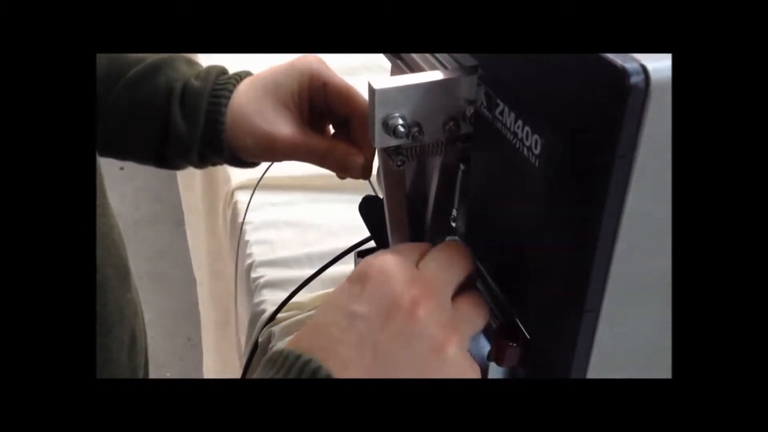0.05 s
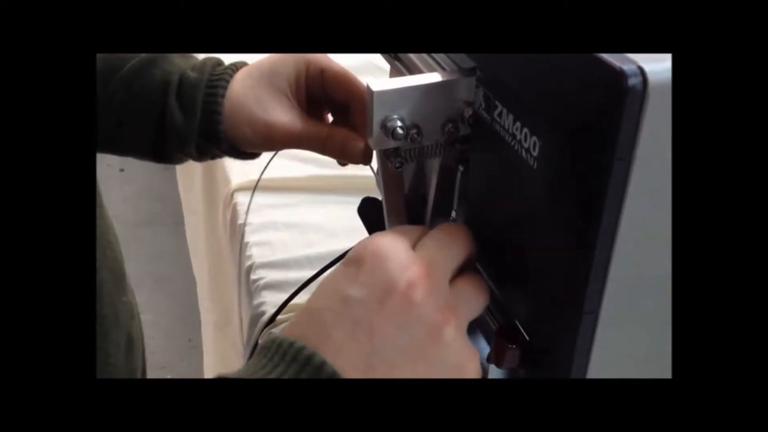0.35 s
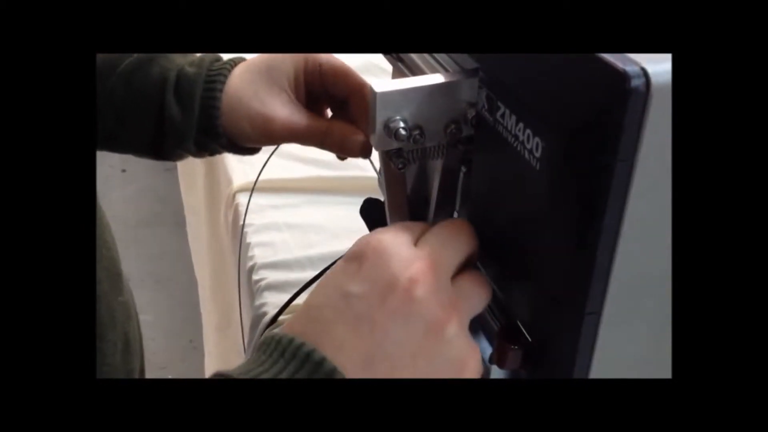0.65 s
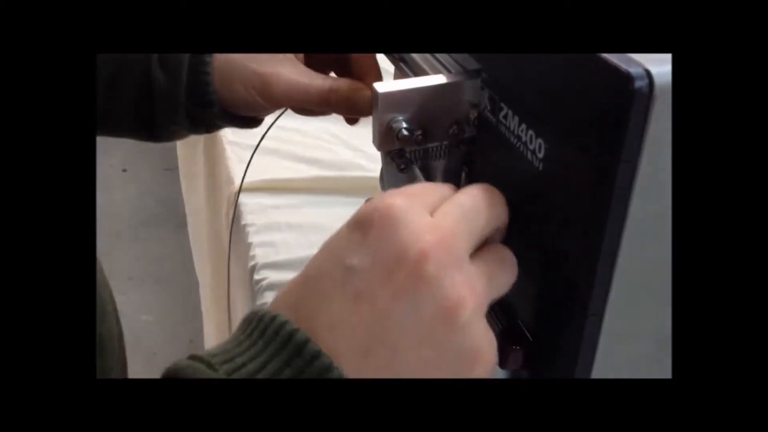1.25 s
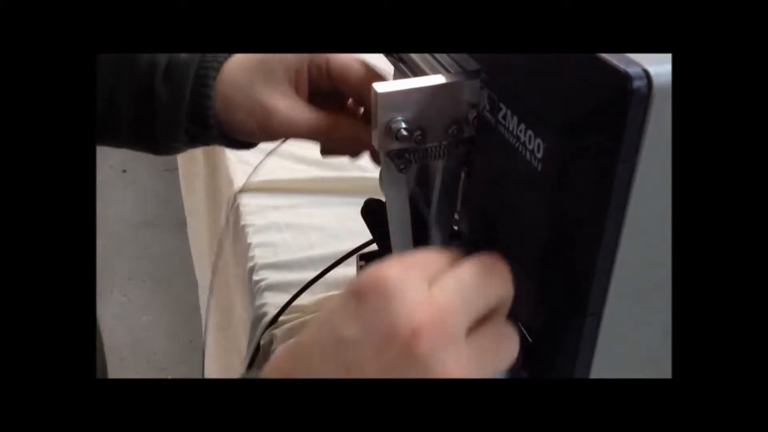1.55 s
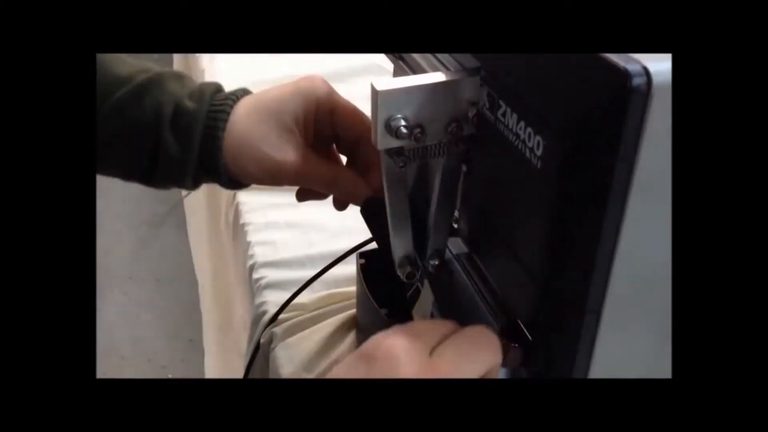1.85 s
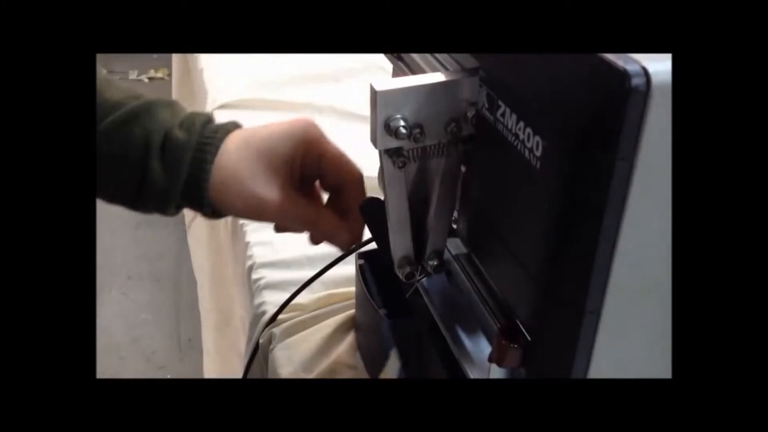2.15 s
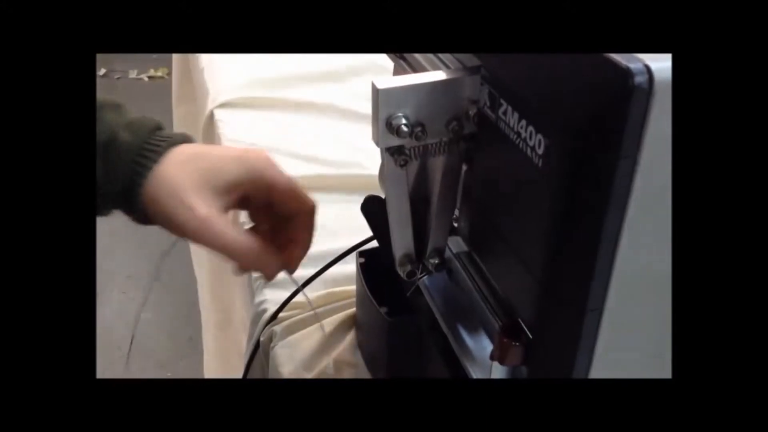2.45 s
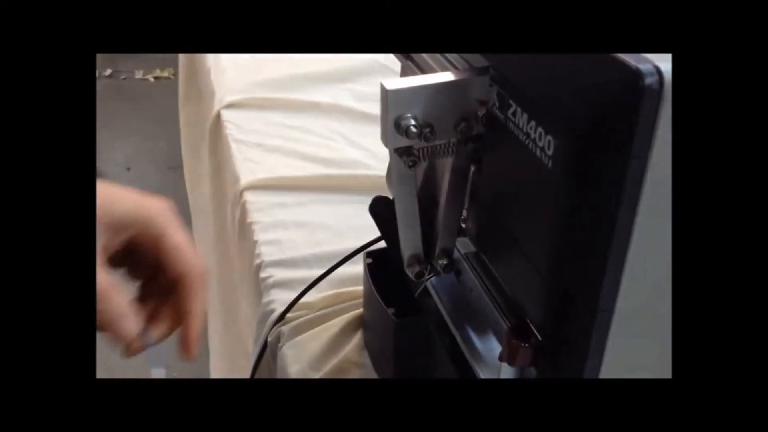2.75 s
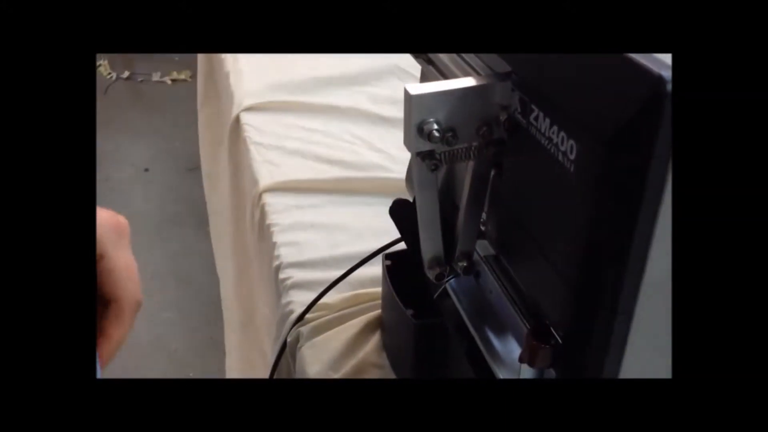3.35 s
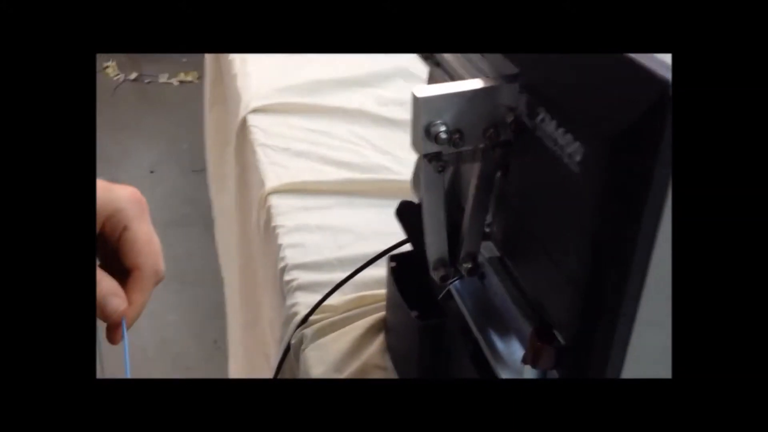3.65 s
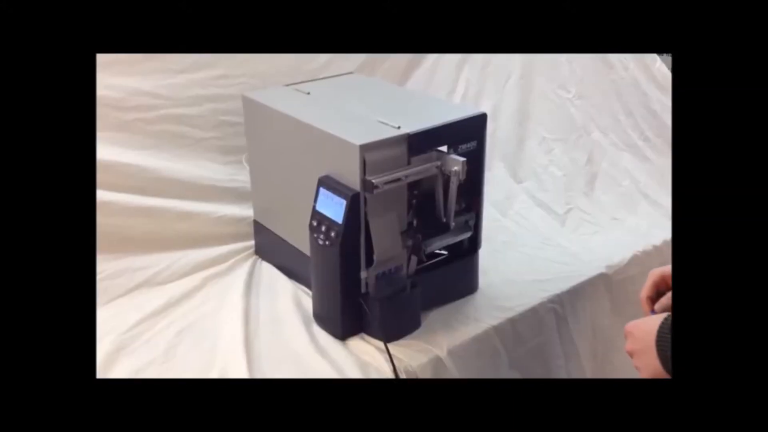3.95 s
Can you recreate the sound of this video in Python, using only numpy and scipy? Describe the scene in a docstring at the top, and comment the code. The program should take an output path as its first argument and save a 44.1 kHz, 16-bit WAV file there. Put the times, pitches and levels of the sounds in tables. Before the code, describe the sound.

Sparse, close clicks come from a label printer being handled in a quiet room with a faint hum. Light thumps and brushing fingers accompany them, until a cloth swish leads into a short cluster of hollow knocks and snaps.

```python
"""A faint mains hum fills a quiet room, and sleeves and fingers brush softly over a label printer.
Hands work its print head: the latch clicks, the frame thumps as the head bumps its stop, and small
parts tick. The hand lets go with a dull scuff. A longer swish of cloth leads to a burst of hollow
knocks on a panel, whose ring is cut off when the sound drops out for a moment."""
import sys
import numpy as np
from scipy import signal
from scipy.fft import rfft, irfft
from scipy.io import wavfile
from scipy.ndimage import uniform_filter1d

SR = 44100
rng = np.random.default_rng(int(sys.argv[2]) if len(sys.argv) > 2 else 0)


def output_pcm(signal):
    """Save a mono or channel-first signal as 16-bit PCM at the path in sys.argv[1].

    Samples are clipped to [-1, 1] before scaling.
    """
    pcm = np.clip(np.atleast_2d(signal).T, -1, 1) * 32767
    wavfile.write(sys.argv[1], SR, np.round(pcm).astype(np.int16))


N = 176400  # 4 seconds

# Tone color of the room's steady noise: pitch_hz, level_db
AIR_COLOR = [(15, -64), (25, -29), (86, -18.5), (110, -9), (148, -8.5), (246, -3.5), (290, -7.5),
             (340, -11), (600, -10.5), (970, -12.5), (1900, -15.5), (2300, -18.5), (4300, -21.5),
             (6050, -22.5), (8000, -24.5), (10000, -28), (12000, -23.5), (15500, -19.5)]
# Tones of the hum: pitch_hz, level_db
HUM_TONES = [(100, -84.5), (120, -72), (197, -82.5), (242, -85.5)]
# The room's echo (decay_s is always the time to fade by 60 dB): pitch_hz, decay_s
ROOM_DECAY = [(150, 0.42), (500, 0.31), (2000, 0.4), (6000, 0.27), (14000, 0.057)]
# Brushes, the narrowest a faint whistle: peak_s, rise_s, fade_s, level_db, center_hz, width_octaves
BRUSH_STROKES = [(.01, .02, .05, -65, 4100, 0.54), (.19, 0.062, 0.12, -71, 4250, 0.41),
                 (.34, 0.0071, 0.077, -67, 8000, 1.1), (.852, 0.11, 0.022, -67.5, 7460, 0.97),
                 (1.471, 0.018, 0.031, -57.5, 8200, 1), (1.655, 0.036, 0.016, -58, 5050, 2.3),
                 (1.74, 0.41, 0.15, -64, 7500, 2.6), (1.72, 0.24, .1, -70, 8000, 0.053),
                 (2.04, 0.013, 0.044, -57.5, 7430, 1.7), (2.39, 0.016, 0.033, -68, 4530, 0.16),
                 (2.71, .04, 0.035, -65, 3720, 0.49), (2.808, .015, 0.015, -58, 4240, 0.18),
                 (2.92, 0.65, 0.73, -66, 10800, 4.3), (3.105, .02, 0.056, -63, 13000, 0.37),
                 (3.19, 0.028, 0.06, -61.5, 2460, 0.82), (3.38, 0.25, .1, -66, 11800, 1.8),
                 (3.3, 0.14, 0.15, -74, 10600, .012), (3.47, 0.021, 0.1, -51.5, 3430, 1.24),
                 (3.523, 0.014, 0.04, -42.5, 10600, 1.37), (3.71, 0.025, 0.055, -56.5, 9000, 0.7),
                 (3.885, 0.023, 0.046, -63.5, 4900, 0.25), (3.96, 0.076, 0.18, -66, 415, 0.33)]
# Tone color of sliding cloth: pitch_hz, level_db
CLOTH_COLOR = [(100, -15), (400, -2), (750, 8.5), (1500, 3), (2800, -4), (4300, 0), (6000, -5.5),
               (7800, -3), (9500, -7), (11500, -1.5), (15000, -5.5)]
# Clicks of the latch and small parts: start_s, level_db, ring_hz, ring_db, tilt_db_per_octave, decay_s
CLICK_HITS = [(.3168, -9, 4550, -4.5, -1.6, 0.017), (.349, -26, 8150, 4, 4, 0.023),
              (.3565, -30, 4800, 5, 0, 0.008), (.8555, -36, 4620, 0, 2, 0.027),
              (0.8599, -33.5, 4700, -2, 1, 0.02), (0.868, -30, 13800, 0, 9, 0.0074),
              (1.146, -36, 2260, -4, -3, 0.014), (1.532, -35.5, 11000, -9, 0, 0.012),
              (1.540, -34.5, 11100, -6, 3, 0.011), (1.9606, -21.5, 4470, -3, -3, 0.018),
              (2.0469, -22.5, 4380, -2, -2.5, 0.0085), (2.0515, -25, 12700, 10, -5, 0.018),
              (2.059, -24, 13000, 13, 2, .011), (2.9026, -18, 9800, -9.5, 7, 0.016),
              (2.9998, -34, 7800, 3, 2, 0.023), (3.074, -36, 7800, -5, 4, .02),
              (3.0837, -16.5, 12200, -7, 19, 0.0067), (3.0893, -25, 12500, 6, 19, 0.0052),
              (3.145, -32, 6800, -6, 0, .035), (3.175, -30, 7700, -3, 0, .03),
              (3.6587, -14, 5050, -4, -3.5, 0.016), (3.6601, -11, 6270, 4, -3, 0.014),
              (3.6637, -17, 2342, -4, -8.5, 0.042), (3.7666, -20.5, 13300, -2, 3.5, 0.011)]
# Tones the latch rings with: pitch_hz, level_db
LATCH_TONES = [(1900, -7), (2400, -0.5), (2850, -4.5), (3400, -14), (4400, -11), (5000, -1.5), (5650, -3),
               (7700, -6), (8900, -5.5), (9700, -8), (10900, -3.5), (12600, -6), (14200, 0)]
# Thumps of the frame: start_s, level_db, pitch_hz, swell_s, ring_db
THUMP_HITS = [(0.3245, -38, 251, 0.012, -4), (0.3608, -30, 242.4, 0.01, 1), (.864, -46, 270, 0.0064, 4.5),
              (2.0563, -34.5, 228, 0.0073, 1.5), (2.0815, -46.5, 204, 0.0052, 5),
              (3.21, -51, 200, 0.011, -9)]
# Tones the frame rings with: pitch_hz, level_db, decay_s
FRAME_TONES = [(195.5, -11, 0.55), (242, -6, 0.17), (279.6, -11.5, 0.39), (355, -20, 0.15),
               (516, -10, 0.33), (562, -18, 0.35), (713, -20, 0.068), (830, -10, 0.22), (980, -8, .2)]
# Tone color of the frame's shudder: pitch_hz, level_db
SHUDDER_COLOR = [(60, -40), (110, -20), (170, -10), (260, -4), (400, 9), (560, 6), (900, -2), (1500, -9),
                 (3000, -49), (8000, -48)]
# Hollow knocks: start_s, level_db, pitch_hz, swell_s
KNOCK_HITS = [(.355, -44.5, 726, 0.0047), (.3605, -39, 540, 0.0043), (.864, -57, 527, 0.0043),
              (2.041, -47.5, 547, 0.0057), (3.521, -42, 655, .005), (3.589, -46, 686, 0.0015),
              (3.595, -43.5, 715, .0035), (3.6135, -38.5, 622, 0.0073), (3.6462, -34.5, 780, 0.0019),
              (3.6512, -36.5, 690, .003), (3.6813, -18.5, 650, 0.0038)]
# Tones the panel rings with: pitch_hz, level_db, decay_s
PANEL_TONES = [(573, -32, 0.41), (632.3, -31, 0.24), (672, -40, 0.19), (752, -21.5, 0.23),
               (1218, -25, 0.31), (1330, -29.5, 0.38), (1460, -29.5, .12), (1810, -33, 0.19),
               (1851, -26, 0.16), (2036, -32.5, 0.092), (2552, -35, 0.25)]
# Tone color of the noisy rap in each knock: pitch_hz, level_db
RAP_COLOR = [(80, -41), (250, -2), (400, -6), (650, 9), (980, -14), (1250, 0.5), (2000, -2), (2700, -11.5),
             (3500, -15.5), (12000, -31.5)]
# Tone color of the scuff: pitch_hz, level_db
SCUFF_COLOR = [(88, -53), (150, -37), (233, -11), (319, -14), (524, -1), (680, -16), (813, 0.5),
               (1080, -22), (1260, -10), (2220, -16.5), (2580, -41), (4000, -44), (5200, -61), (8800, -120)]

LOW_CUT_HZ, TOP_HZ = 110, 15450
CLICK_RISE_S, CLICK_LOW_HZ = 0.00013, 680
RING_BUILD_S, RING_WIDTH_OCTAVES = 0.015, 0.27
DROPOUT_S, RETURN_S, DROPOUT_FADE_S = 3.782, 3.8295, 0.0074


def gain(db):
    """Turns decibels into a number to multiply by."""
    return 10 ** (np.asarray(db) / 20)


def unit_power(x):
    """Scales a sound so its average power is 1."""
    return x / np.sqrt(np.mean(x ** 2) + 1e-20)


def unit_energy(x):
    """Scales a sound so its total energy is 1."""
    return x / np.sqrt(np.sum(x ** 2) + 1e-20)


def look_up(table, hz):
    """Reads between the rows of a table, with pitch spaced by octaves."""
    pitches, values = np.transpose(table)
    return np.interp(np.log(hz + 1), np.log(pitches + 1), values)


def add(mix, start_s, sound):
    """Mixes a sound in at its start time."""
    part = mix[max(round(start_s * SR), 0):][:len(sound)]
    part += sound[:len(part)]


def noise(color, size):
    """Noise with the given tone color and a power of 1."""
    weights = gain(look_up(color, np.fft.rfftfreq(size, 1 / SR)))
    return unit_power(irfft(rfft(rng.standard_normal(size)) * weights, size))


def decay(t, decay_s):
    """A fade that falls 60 dB in decay_s."""
    return np.exp(-np.log(1000) * t / decay_s)


def ring(tones, t):
    """A struck object rings with several tones, each fading at its own speed."""
    return sum(gain(db) * decay(t, decay_s) * np.sin(2 * np.pi * hz * t) for hz, db, decay_s in tones)


def push(t, hz, swell_s):
    """A few vibrations that swell and die just as fast."""
    return np.sin(np.pi / 2 * np.minimum(t / swell_s, 2)) ** 2 * np.sin(2 * np.pi * hz * t)


def rub_pressure(peak_s, rise_s, fade_s):
    """A rub presses in smoothly, then eases off."""
    t = np.arange(N) / SR - peak_s
    return np.exp(-(np.minimum(t, 0) / rise_s) ** 2 - np.maximum(t, 0) / fade_s)


def room_echo(sound, level_db):
    """The room answers with a soft wash of echoes whose highest tones die first."""
    hz, t, spectrum = signal.stft(rng.standard_normal(SR // 2), SR, nperseg=256)
    fades = decay(t, look_up(ROOM_DECAY, hz)[:, None])
    tail = signal.istft(spectrum * fades, SR, nperseg=256)[1]
    tail[:SR // 300] = 0  # the first echo takes about 3 ms to return
    return gain(level_db) * signal.fftconvolve(sound, unit_energy(tail))[:N]


def air_and_hum():
    """Steady room noise and a mains hum that wavers slightly."""
    t = np.arange(N) / SR
    out = gain(-64) * noise(AIR_COLOR, N)
    for hz, db in HUM_TONES:
        wobbles = rng.standard_normal(30) + 1j * rng.standard_normal(30)  # in level and phase
        waver = 1 + 0.049 * np.interp(t, np.linspace(0, N / SR, num=30), wobbles)
        out += np.sqrt(2) * gain(db) * (waver * np.exp(2j * np.pi * hz * t)).real
    return out


def brushes():
    """Cloth and skin slide over the printer in tiny uneven slips."""
    out, hz = np.zeros(N), np.fft.rfftfreq(N, 1 / SR) + 1
    cloth = gain(look_up(CLOTH_COLOR, hz)) * (hz < TOP_HZ)
    for peak_s, rise_s, fade_s, db, center_hz, width_octaves in BRUSH_STROKES:
        hiss = rng.standard_normal(N)
        grain_db = 1.5 * unit_power(uniform_filter1d(rng.standard_normal(N), size=40))
        band = 1 / (1 + 0.5 * (np.log2(hz / center_hz) / width_octaves) ** 2)
        swish = unit_power(irfft(rfft(hiss * gain(grain_db)) * cloth * band, N))
        out += gain(db) * rub_pressure(peak_s, rise_s, fade_s) * swish
    return out


def latch_clicks():
    """Each snap makes a crack and rings the latch and the part it hits; only the crack echoes."""
    out, cracks, t = np.zeros(N), np.zeros(N), np.arange(4096) / SR
    hz = np.fft.rfftfreq(len(t), 1 / SR) + 1
    band = (hz / np.hypot(hz, CLICK_LOW_HZ)) ** 2 * (hz < TOP_HZ)
    for start_s, db, ring_hz, ring_db, tilt, decay_s in CLICK_HITS:
        brightness = gain(tilt * np.log2(np.clip(hz, CLICK_LOW_HZ, TOP_HZ)))
        crack = unit_power(irfft(rfft(rng.standard_normal(len(t))) * brightness * band))
        latch = sum(gain(tone_db + tilt * np.log2(f)) * np.sin(2 * np.pi * (f * t + rng.random()))
                    for f, tone_db in LATCH_TONES)
        part = np.sqrt(2) * np.sin(2 * np.pi * ring_hz * t)
        snap = unit_power(latch) + gain(-0.5) * crack + gain(ring_db) * part
        shape = np.minimum(t / CLICK_RISE_S, 1) * decay(t, decay_s)
        add(out, start_s, gain(db) * unit_energy(shape * snap))
        add(cracks, start_s, gain(db) * unit_energy(shape * crack))
    return out + room_echo(cracks, level_db=-12.5)


def frame_thumps():
    """The print head bumps its stop: a low push, the ring of the frame and a dull shudder."""
    out, t = np.zeros(N), np.arange(SR * 3 // 4) / SR
    for start_s, db, hz, swell_s, ring_db in THUMP_HITS:
        rise = np.minimum(t / swell_s, 1)
        shudder = gain(-21) * noise(SHUDDER_COLOR, len(t)) * decay(t, decay_s=0.39)
        # The ring builds up, most strongly in the tones near the pitch of the blow.
        tones = [(f, tone_db - 10 * np.log10(1 + (np.log2(f / hz) / RING_WIDTH_OCTAVES) ** 2), decay_s)
                 for f, tone_db, decay_s in FRAME_TONES]
        frame = gain(ring_db) * np.minimum(t / RING_BUILD_S, 1) ** 2 * ring(tones, t)
        add(out, start_s, gain(db) * (push(t, hz, swell_s) + frame + rise * shudder))
    return out + room_echo(out, level_db=-9.5)


def panel_knocks():
    """Hollow blows on a panel: a short push, a noisy rap and the ring after it."""
    out, t = np.zeros(N), np.arange(SR // 2) / SR
    rap_fade = gain(-8.5) * decay(t, decay_s=0.027) + gain(-23.5) * decay(t, decay_s=0.33)
    panel = ring(PANEL_TONES, t)
    for start_s, db, hz, swell_s in KNOCK_HITS:
        rise = np.minimum(t / swell_s, 1)
        rap = noise(RAP_COLOR, len(t)) * rap_fade
        add(out, start_s, gain(db) * (push(t, hz, swell_s) + rise * (panel + rap)))
    return out + room_echo(out, level_db=-13.5)


def hand_scuff():
    """The hand rubs the print head as it lets go, making one dull, hollow scuff."""
    pressure = rub_pressure(peak_s=1.484, rise_s=0.024, fade_s=0.033)
    return gain(-46.5) * pressure * noise(SCUFF_COLOR, N)


def scene():
    """Mixes all the sounds; the handling noises lose their deepest bass."""
    t = np.arange(N) / SR
    hits = (latch_clicks() + panel_knocks()) * (t < RETURN_S)  # these stay silent after the dropout
    thumps = frame_thumps()
    rubs = brushes() + hand_scuff()
    handling = hits + thumps + rubs + room_echo(rubs, level_db=-11.5)
    bass_cut = signal.butter(2, LOW_CUT_HZ, "high", fs=SR, output="sos")
    return (signal.sosfilt(bass_cut, handling) + air_and_hum())[None]


def record(dry):
    """The sound drops out briefly after the last knock, leaving faint hiss; the top treble is cut."""
    t = np.arange(N) / SR
    dip = gain(-35) + gain(-12) * np.exp(-np.maximum(t - DROPOUT_S, 0) / DROPOUT_FADE_S)
    volume = np.where((t > DROPOUT_S) & (t < RETURN_S), dip, 1)
    hiss = gain(-83) * rng.standard_normal(N)
    treble_cut = signal.firwin(511, TOP_HZ, window=("kaiser", 9), fs=SR)
    return signal.oaconvolve(dry * volume + hiss, treble_cut[None], "same")


dry = scene()
out = record(dry)
output_pcm(out)
```